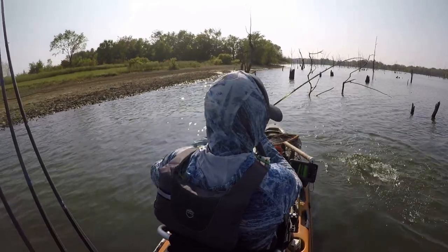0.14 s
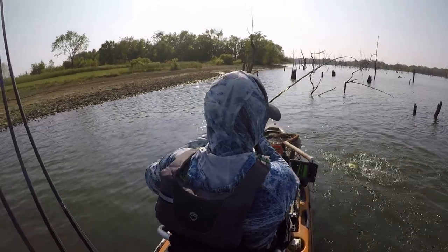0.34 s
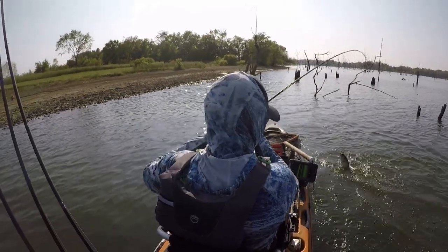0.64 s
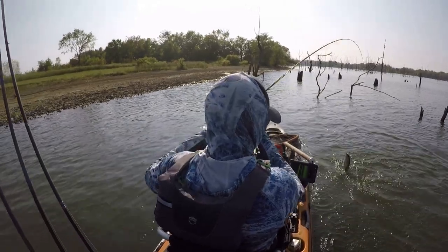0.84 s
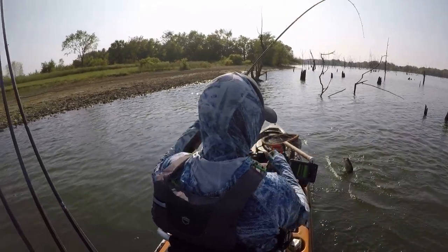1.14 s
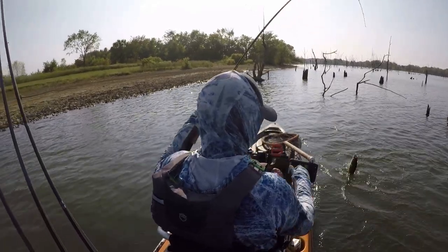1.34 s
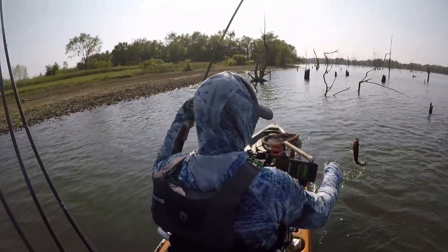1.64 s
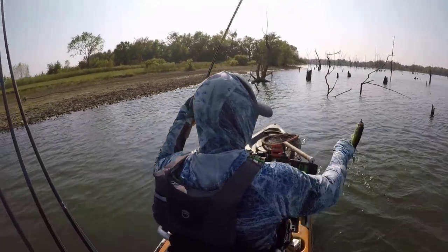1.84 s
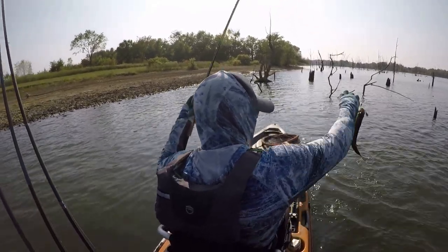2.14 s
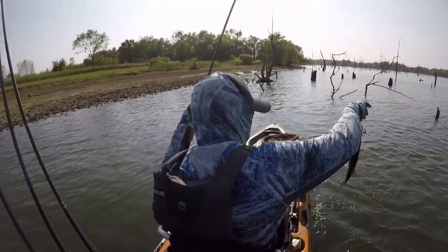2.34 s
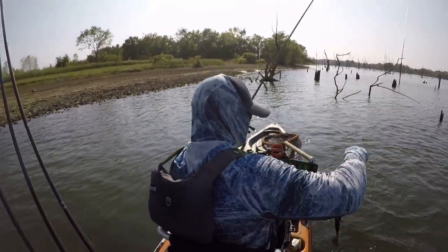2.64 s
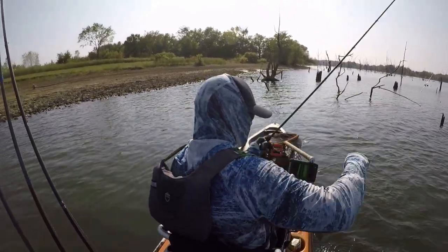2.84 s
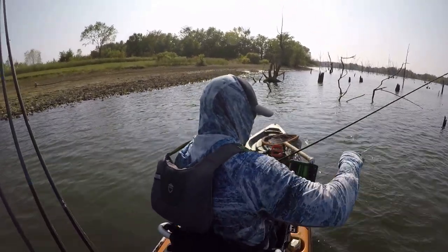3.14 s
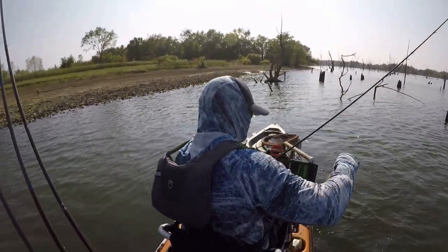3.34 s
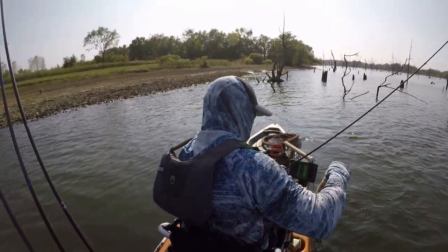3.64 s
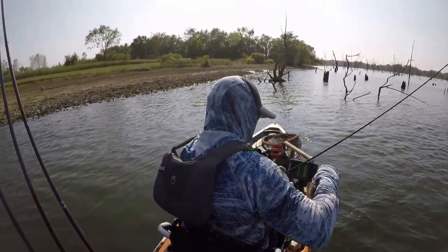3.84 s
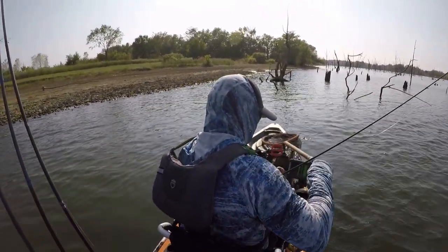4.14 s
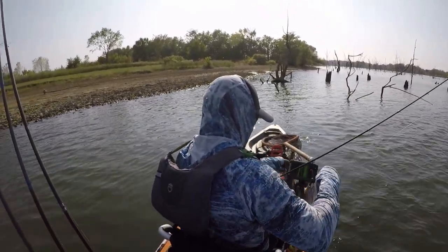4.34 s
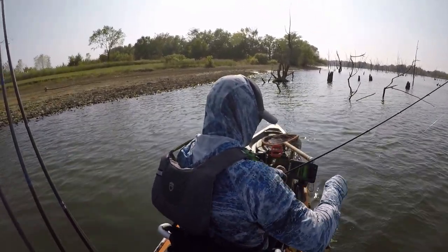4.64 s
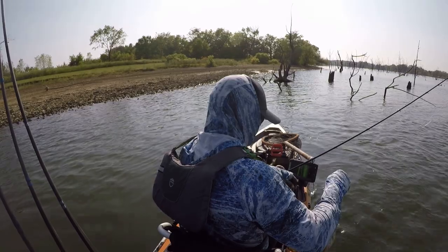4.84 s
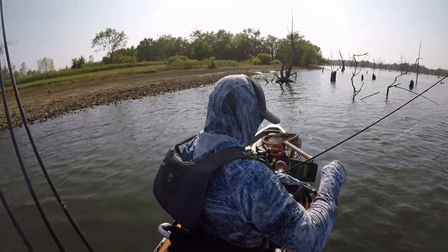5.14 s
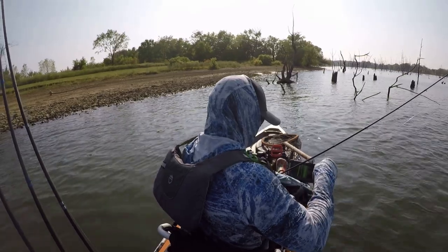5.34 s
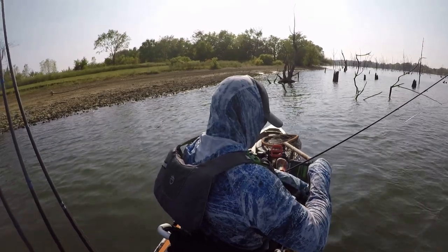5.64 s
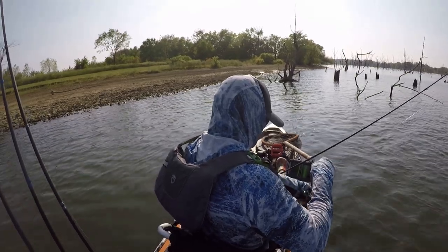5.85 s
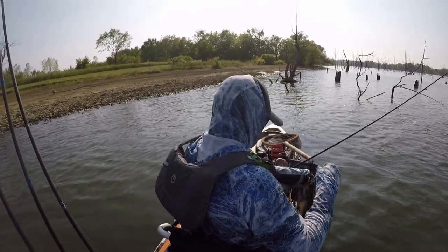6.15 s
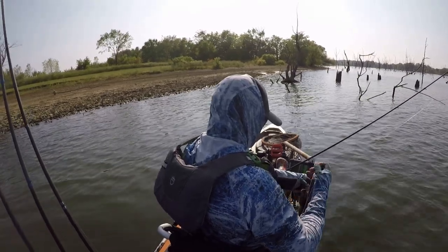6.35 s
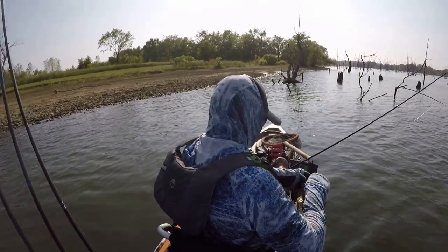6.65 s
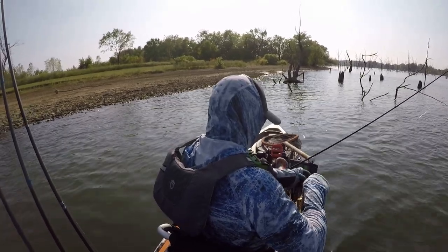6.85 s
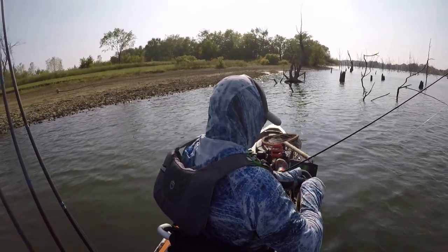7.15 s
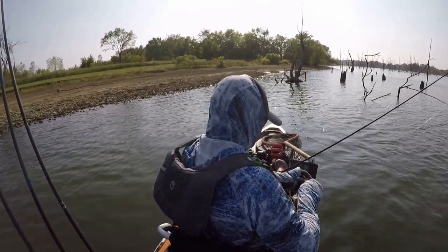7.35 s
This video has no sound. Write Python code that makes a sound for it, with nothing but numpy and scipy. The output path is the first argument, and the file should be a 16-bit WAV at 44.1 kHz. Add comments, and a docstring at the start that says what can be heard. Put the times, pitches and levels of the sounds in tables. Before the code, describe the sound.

A small fish splashes and bubbles beside a kayak, then gear clicks and hollow hull knocks follow over a low motor hum outdoors.

```python
"""From the start insects hiss along the shore, a motor hums and the camera, on a pole behind the angler, ticks.
A small fish thrashes beside the kayak: noise spray dies away over gliding bubble tones and faint ticks.
It is lifted in and unhooked amid gear clicks, swishing cloth, deck scrapes and knocks, crowded around 4 s.
Splash, gear and cloth come by air; knocks, hum and hull rumble come up the pole as decaying tones, steady
tones and filtered noise, and rock the two microphone ports against each other."""
import sys
import numpy as np
from scipy import signal
from scipy.fft import rfft, irfft
from scipy.io import wavfile
from scipy.ndimage import uniform_filter1d

SR = 44100
rng = np.random.default_rng(int(sys.argv[2]) if len(sys.argv) > 2 else 0)


def generate_wav(sig):
    """Save sig (samples, or channels by samples) to the path in sys.argv[1] as 16-bit PCM at SR."""
    pcm = np.round(np.clip(np.atleast_2d(sig).T, -1, 1) * 32767).astype(np.int16)
    wavfile.write(sys.argv[1], SR, pcm)


def volts_from_db(level):
    """Convert decibel levels to linear amplitude ratios."""
    exponent = np.asarray(level, float) / 20
    return 10 ** exponent


N = 330074
T = np.arange(N) / SR  # seconds
# how each hull part follows the load: (dB at a load of -35 dB, dB per dB of load)
SWAY, DEEP, HULL, LOW_TONE = (-43.5, 0.86), (-36, 1.17), (-37, 0.31), (-36.5, 1.19)


def noise():
    """White noise over the whole scene."""
    return rng.standard_normal(N)


def unit(x):
    """Scale to rms 1."""
    return x / np.sqrt(np.mean(x ** 2))


def band(x, lo_hz, hi_hz, order=2):
    """Band-pass, steeper with order."""
    return signal.sosfilt(signal.butter(order, [lo_hz, hi_hz], "band", fs=SR, output="sos"), x)


def ring(x, hz, width_hz):
    """One resonance, gain 1 at its centre."""
    return signal.lfilter(*signal.iirpeak(hz, hz / width_hz, SR), x)


def columns(table):
    """Curve columns sample by sample; the first column is time in seconds."""
    s, *cols = np.transpose(table)
    return [np.interp(T, s, c) for c in cols]


def spectrum_gain(points):
    """Gain at each FFT bin from (Hz, dB) points, drawn straight over log frequency."""
    hz, db = np.transpose(points)
    f = np.maximum(np.fft.rfftfreq(N, 1 / SR), 1)
    return volts_from_db(np.interp(np.log(f), np.log(hz), db))


def coloured(points):
    """Noise with a (Hz, dB) spectrum, rms 1."""
    return unit(irfft(rfft(noise()) * spectrum_gain(points), N))


def walk(rate):
    """Random levels held 1 / rate s and slewed twice; spread near 1."""
    k = int(SR / rate)
    held = np.repeat(rng.standard_normal(N // k + 1), k)
    return 1.396 * uniform_filter1d(uniform_filter1d(held, k), k)[:N]


def add(out, s, grain):
    """Mix a grain in at time s."""
    i = max(int(s * SR), 0)
    out[..., i:i + grain.shape[-1]] += grain[..., :N - i]


def stereo(mid, side):
    """Two ports from the part they hear alike and the part they hear opposed."""
    return np.array([mid + side, mid - side])


def span(t0, t1, fade):
    """1 between two times, with soft ends."""
    return np.clip(np.minimum(T - t0, t1 - T) / fade + .5, 0, 1)


def load(part):
    """Level in dB of a part of the hull as water and weight work it."""
    # Each row: time in seconds, load in dB.
    load_curve = [(0.0, -36.5), (1.65, -40.5), (2.29, -37), (2.58, -39), (2.85, -42), (3.12, -46),
                  (3.77, -38.5), (4.02, -27.5), (4.21, -31), (4.62, -33.5), (5.58, -27.5), (6.44, -31.5),
                  (6.67, -27), (7.48, -36.5)]
    return part[0] + part[1] * (columns(load_curve)[0] + 35)


def by_air(x):
    """The ports hear a sound out of step: part of the opposed sound is a quarter cycle off, flipped in the treble."""
    # How far apart the ports hear a sound. Each row: frequency in Hz, gain in dB of the opposed
    # part, ahead of the factors 0.46 and -0.3 below.
    port_gains = [(600, 7), (1200, 5.5), (2200, 1.5), (3000, -3.5), (4000, -3), (5000, -4), (6500, 8.5),
                  (10000, 0)]
    f = np.maximum(np.fft.rfftfreq(N, 1 / SR), 1)
    turn = 1j * np.tanh((4500 - f) / 300)
    side = irfft(rfft(x) * spectrum_gain(port_gains) * (0.46 * turn - .3), N)
    return stereo(x, side)


def shore():
    """Smooth far hiss of shaped noise; one insect, a narrow noise band, swells in and out above it."""
    # Hiss alike in both ports. Each row: frequency in Hz, relative spectrum level in dB.
    alike = [(180, 4), (300, -1), (663, -4), (2040, -12), (2980, -14.5), (3630, -8), (6050, -7.5),
             (8010, -16), (8700, -15.5), (12700, -26), (15500, -34)]
    # Hiss opposed in the ports. Each row: frequency in Hz, relative spectrum level in dB.
    opposed = [(180, -15), (300, 0), (366, -11.5), (877, -9.5), (3180, -32), (3690, -26.5), (5390, -21),
               (5950, -16.5), (6570, -22.5), (10400, -33), (12700, -41), (15500, -51)]
    mid_db, side_db = -50, -46
    mid = volts_from_db(mid_db + 0.11 * walk(2.65)) * coloured(alike)
    side = volts_from_db(side_db + 0.23 * walk(3.7)) * coloured(opposed)
    swell = np.sin(np.pi * (T - .09) / .43) ** 4  # one swell each 0.43 s
    insect = volts_from_db(-64) * swell * unit(ring(noise(), 7050., 350.))
    return stereo(mid - 0.16 * side, side + insect)


def hum():
    """Tones in the hull waver a little, nearly alike in both ports: the lowest swells with the load on the
    hull, the next is the motor's, and a higher one comes and goes."""
    # Level of the second tone. Each row: time in seconds, level in dB before the gain of each port.
    motor_level = [(0, -42.5), (2.4, -37.5), (3.4, -34), (3.9, -39), (4.3, -35), (4.5, -32.5), (5.8, -31),
                   (6.4, -27.5), (7.48, -31.5)]
    # The two lower tones, in Hz: a hull tone that follows the load, then the motor tone.
    tone_hz = [82.5, 189.9]
    overtone_db = -50 - 14 * (1 - span(0, 1.567, 0.079) - 1.03 * span(2.54, 2.91, 0.3))
    levels = [load(LOW_TONE)] + columns(motor_level) + [overtone_db]
    out = 0
    for hz, db in zip(tone_hz + [386.5], levels):
        phase = 2 * np.pi * np.cumsum(hz * (1 + 0.004266 * walk(4.6))) / SR
        ports = np.array([volts_from_db(-0.95) * np.sin(phase + 0.094), volts_from_db(1.36) * np.sin(phase)])
        out = out + np.sqrt(2) * volts_from_db(db + 1.45 * walk(16)) * ports
    return out


def rumble():
    """The pole sways one port far more than the other; three noise ranges of hull rumble rock near the pole's modes."""
    sway_db, deep_db, hull_db = load(SWAY), load(DEEP), load(HULL)
    # waves from the thrashing fish rock the pole at first
    wake_db, wake_db_per_s = -29, -14
    sway = (volts_from_db(sway_db) + volts_from_db(wake_db + wake_db_per_s * T)) * unit(ring(noise(), 34.46, 1.3))
    out = np.array([-.6 * sway, 2.5 * sway])
    # level dB, low Hz, high Hz, rocking mode Hz, rocking part dB
    ranges = ((deep_db, 42., 105., 60., -3),
              (hull_db, 95., 200., 135., -4),
              (.5 * hull_db - 29.5, 200., 420., 265., -2.5))
    for db, lo, hi, mode, side_db in ranges:
        mid, side = (band(noise() * volts_from_db(2.18 * walk(25)), lo, hi, order=3) for _ in range(2))
        rocking = volts_from_db(side_db) * unit(ring(side, mode, mode))
        out = out + volts_from_db(db) * stereo(unit(mid), rocking - 0.059 * unit(mid))
    return out


def camera():
    """A high tick once a frame and a thin whine of narrow noise from the electronics."""
    since = (T - .0150) % (1001 / 30000)  # seconds into the frame
    pulse = np.exp(-((since - .0025) / 0.0032) ** 2)
    tick = volts_from_db(-58.0) * pulse * np.sin(2 * np.pi * 8560 * since + 0.59 * walk(30))
    whine = volts_from_db(-63.5 - 0.31 * T + 0.71 * walk(1.27)) * unit(ring(noise(), 6148., 4.3))
    return np.array([tick + whine, tick + 0.48 * whine])


def scrape():
    """Water and gear rub along the deck: uneven friction noise rings resonances that fall away steeply."""
    # Rubs. Each row: start in seconds, end in seconds, level in dB, fade in seconds.
    rubs = [(0, 0.2, -50, 0.12), (0.447, 0.507, -62, .022), (4.083, 4.283, -53.5, .04),
            (4.42, 4.517, -54, .022), (5.278, 5.734, -49.5, 0.024), (5.676, 6.055, -56.5, 0.11),
            (6.636, 6.95, -52.5, 0.29)]
    # Deck resonances. Each row: centre in Hz, half the width of each ring pass in Hz, gain in dB.
    deck_modes = [(863, 145, 30.5), (1083, 52, 25), (1390, 110, 15)]
    grains = noise() * volts_from_db(0.4 * walk(90))
    deck = 0.085 * band(grains, 630.0, 1500.0, order=3)
    for hz, half_width, db in deck_modes:
        once = ring(grains, hz, 2.0 * half_width)
        deck = deck + volts_from_db(db) * ring(once, hz, 2.0 * half_width)
    level = sum(volts_from_db(db) * span(t0, t1, fade) for t0, t1, db, fade in rubs)
    return level * unit(deck)


def rustle():
    """Dense tiny noise grains: spray dying away after the thrashing, then short swishes of sleeve and line."""
    # Swishes. Each row: start in seconds, end in seconds, level in dB, colour in Hz.
    strokes = [(0.99, 1.066, -53, 2870), (1.444, 1.516, -45.5, 3430), (2.292, 2.328, -50.5, 4400),
               (2.48, 2.572, -51.5, 3900), (3.961, 4.04, -49, 3580), (4.057, 4.203, -47.5, 3800),
               (4.233, 4.313, -47.5, 3580)]
    drops = noise() * volts_from_db(3.3 * walk(300))
    # the heavy water falls back first, the fine mist hisses on
    heavy = volts_from_db(-41.5 - 36 * T) * unit(band(drops, 1400.0, 4200.0))
    mist = volts_from_db(-46.0 - 12.6 * T) * unit(band(drops, 3200.0, 7540.0))
    grains = noise() * volts_from_db(2.0 * walk(200))
    swishes = np.zeros(N)
    for t0, t1, db, hz in strokes:
        low = band(grains, 0.71 * hz, 1.17 * hz, order=3)
        high = band(grains, 1.5 * hz, 2.0 * hz)
        swishes += volts_from_db(db) * span(t0, t1, 0.017) * unit(low + 0.69 * high)
    return span(-1, 0.94, 0.24) * (heavy + mist) + swishes


def patter():
    """Faint random ticks of drops and rattling gear, each a few rough cycles at a pitch of its own."""
    # Stretches of ticks. Each row: start in seconds, end in seconds, nominal tick level in dB.
    stretches = [(0, 0.4, -48.5), (0.401, 0.852, -48.5), (4.096, 4.212, -45), (4.23, 4.52, -45)]
    out, t = np.zeros(N), T[:400]
    for t0, t1, db in stretches:
        for when, size, pitch in rng.random((160, 3)):
            hz = 1100 * 7.0 ** pitch
            life = t * hz / (2.2 + 3 * pitch)
            grain = life * np.exp(1 - life ** 2) * np.sin(2 * np.pi * hz * t)
            add(out, t0 + (t1 - t0) * when, volts_from_db(db - 2.3 * np.log(.015 + size)) * grain / 2)
    return out * volts_from_db(1.2 * walk(2500))


def bubbles():
    """Short tones glide up as the cavity closes: the clear ones, and a crowd of faint ones under the spray."""
    # Clear bubbles. Each row: start in seconds, nominal peak in dB, start pitch in Hz, glide in octaves.
    cavities = [(0.017, -31, 2100, 0.45), (.031, -30, 1510, 0.091), (.078, -31, 767, .1),
                (.164, -34, 2210, 1.8), (0.187, -29, 1200, 0.69), (.19, -32, 590, 0.083),
                (0.255, -36, 1800, 1.3), (.276, -34.5, 670, 0.29), (0.312, -32, 2800, 0.79),
                (0.397, -33, 1880, 2.4), (.475, -37.5, 990, .05), (.558, -36, 693, 0.22),
                (0.562, -23.5, 369, 0.24), (0.621, -38, 470, .2), (0.618, -37, 1320, 0.5),
                (0.681, -40, 1390, 1.2), (0.745, -29.5, 5600, 0.16), (0.845, -35, 2710, .15),
                (0.928, -38, 2880, 0.19), (1.26, -38, 900, 0.36), (1.39, -39, 880, 0.079),
                (1.587, -41.5, 1610, .14), (3.817, -26, 475, 0.073), (4.341, -19.5, 581, 0.044),
                (4.585, -31.5, 823, 0.074)]
    life_cycles, cycles_per_octave = 10.2, 7.4  # at the start pitch; a wide glide lasts longer
    clear = [(*row, life_cycles + cycles_per_octave * row[3]) for row in cavities]
    when, size, pitch, glide = rng.random((500, 4)).T
    hz = 600 * 10.5 ** pitch
    faint_db = -45 - 10 * when - 3.5 * np.log(.02 + size)
    faint = np.c_[.85 * when ** 2.2, faint_db, hz, .6 * glide, 5 + .0012 * hz]
    out = np.zeros(N)
    wobble = .03 * walk(200)  # octaves; the cavity is tossed about
    for s, db, hz, octaves, cycles in np.r_[clear, faint]:
        life = T[:2000] * hz / cycles
        bend = octaves * np.minimum(life, 1) + wobble[int(s * SR):][:len(life)]
        phase = 2 * np.pi * np.cumsum(hz * 2 ** bend) / SR
        shape = 0.88 * np.tanh(life / 0.24) * np.exp(-.9 * life) * np.exp(-life ** 4)
        add(out, s, volts_from_db(db) * shape * np.sin(phase))
    # broken water makes each tone flutter
    return out * volts_from_db(2.5 * walk(1300))


def clicks():
    """Gear, hook and slaps: hard contact noise around the object's colour, over the lower knock of its body."""
    # Contacts. Each row: start in seconds, contact level in dB (its peak is 2.5 dB higher),
    # colour in Hz, body peak in dB.
    contacts = [(0.232, -44, 1100, -35.5), (0.285, -35, 7000, -55), (0.352, -11, 4360, -24.5),
                (0.364, -33, 2600, -50), (0.412, -22, 4500, -35.5), (0.4547, -29, 6340, -55),
                (0.4753, -31.5, 4840, -49), (0.564, -33, 4470, -46), (0.695, -33.5, 5340, -41),
                (0.784, -32, 5800, -44), (2.307, -34, 5600, -50), (2.46, -38, 6000, -54),
                (3.0503, -38, 2200, -27), (3.063, -16.5, 5270, -41), (3.0665, -16.5, 6600, -47),
                (3.301, -37, 5000, -58), (3.4693, -34.5, 5180, -45), (3.8284, -32.5, 3620, -39),
                (3.9973, -14.5, 2700, -25.5), (4.042, -27, 5900, -39), (4.057, -32, 3100, -48),
                (4.102, -33.5, 4950, -35), (4.122, -31, 3380, -43), (4.14, -31.5, 3600, -52),
                (4.162, -41, 3400, -48), (4.176, -30, 3360, -60), (4.1872, -26.5, 4860, -35.5),
                (4.198, -28, 3000, -53), (4.236, -25, 3180, -30), (4.24, -24.5, 4440, -38),
                (4.256, -37, 2300, -49), (4.2769, -25.5, 5900, -35.5), (4.293, -30, 3430, -33),
                (4.33, -31.5, 3480, -53), (4.4082, -29, 3300, -29.5), (4.43, -40, 1500, -29),
                (4.4558, -32.5, 3900, -33), (5.293, -36, 2660, -29), (5.6409, -40, 2760, -28),
                (5.671, -29.5, 2300, -15.5), (5.681, -33, 2140, -23.5), (5.8596, -32.5, 3870, -43),
                (5.975, -40, 4000, -42), (6.025, -42, 2500, -38), (6.041, -35, 4360, -42),
                (6.102, -47, 1500, -39.5), (7.015, -39, 3000, -51), (7.317, -32.5, 6200, -44)]
    # burst length in seconds at 4 kHz and -24 dB; duller and louder ones last longer
    burst_s, colour_power, growth_per_db = 0.0031, 0.15, 0.03
    out, t = np.zeros(N), T[:3000]
    for s, db, hz, body_db in contacts:
        hiss = rng.standard_normal(len(t))
        life = t / (burst_s * (4000 / hz) ** colour_power * np.exp(growth_per_db * (db + 24)))
        attack = 1 - np.exp(-(life / 0.3) ** 2.5)
        decay = np.exp(-1.3 * life ** 1.5) + 0.1 * np.exp(-t / 0.005)
        burst = hiss * attack * decay
        bright = band(burst, 6300., 7900.)
        air = min(hz / 4200, 1) ** 3 * band(burst, 8500., 14000.)
        # brighter and louder contacts carry more treble
        treble_gain = (hz / 5000) ** 0.43 * volts_from_db(0.086 * (db + 27))
        top = band(burst, 0.54 * hz, min(1.345 * hz, 11000.)) + (0.56 * bright + 0.05 * air) * treble_gain
        # the top of the body dies first
        body = band(hiss * np.exp(-t / 0.011), 506.0, 1530.0)
        body = body + 0.83 * band(hiss * np.exp(-t / 0.0045), 1390.0, 1615.0)
        add(out, s, volts_from_db(db + 2.5) * top / np.abs(top).max() + volts_from_db(body_db) * body / np.abs(body).max())
    return out


def knocks():
    """Each blow on the hull is a thud of a few cycles with a hard edge; its rocking part sets the pole ringing."""
    # Blows. Each row: time in seconds, rocking thud level in dB, in-phase thud level in dB,
    # pitch at the peak in Hz, hard edge strength in dB.
    hull_blows = [(0.234, -39, -19, 317, -21.5), (0.248, -30, -19, 308, -23), (0.493, -35, -20.5, 193, -40),
                  (0.699, -13, -25, 165, -21), (1.104, -13.5, -27.5, 143, -34),
                  (1.262, -11, -38, 278, -17.5), (1.299, -17, -21, 200, -38), (1.893, -13, -21.5, 212, -25),
                  (2.054, -9.5, -17, 173, -25), (3.055, -14.5, -18, 295, -15),
                  (3.305, -15, -16.5, 200, -26), (3.386, -20, -17.5, 195, -22.5),
                  (3.504, -6.5, -9, 193, -14.5), (3.823, -28, -10.5, 265, -23),
                  (3.854, -10.5, -18, 253, -64), (4.021, -3.5, -11, 119, -19),
                  (4.057, -12, -11.5, 132, -28), (4.22, -21, -20.5, 252, -51), (4.321, -9.5, -23, 233, -30),
                  (4.348, -3, -14, 200, -18), (4.418, -11.5, -17, 126, -36), (5.072, -11.5, -22, 163, -39),
                  (5.416, -9.5, -44, 247, -22), (5.645, -4.5, -27, 226, -16), (5.708, -10, -20.5, 255, -19),
                  (5.729, -15, -14.5, 102, -57), (5.895, -19, -17, 159, -41),
                  (6.197, -6.5, -16.5, 157, -22), (6.38, -2.5, -10.5, 186, -8.5),
                  (6.525, -11, -16, 139, -29), (6.71, -15, -27, 142, -24)]
    # Pole modes. Each row: frequency in Hz, relative level in dB, time to fall 60 dB in seconds.
    pole_modes = [(28.4, -5.5, 0.38), (58, -12.5, 0.28), (135, -2, 0.11), (262.4, -8.5, 0.18)]
    # Hull shell modes, rung by a hard edge. Each row: frequency in Hz, relative level in dB,
    # time to fall 60 dB in seconds.
    shell_modes = [(517, -32, 0.021), (613, -8.5, 0.089), (900, -2, 0.023), (1200, -1, 0.021)]
    hard_cycles, soft_cycles_per_db = 1.22, 0.11
    mid, side, blows, edges = np.zeros((4, N))
    t = np.arange(-1300, 4000) / SR
    turns = rng.uniform(0, 2 * np.pi, len(hull_blows))
    for (s, side_db, mid_db, hz, edge_db), turn in zip(hull_blows, turns):
        # a blow lasts longer the further its edge lies under its thud
        softness_db = max(max(side_db, mid_db) - edge_db, 0)
        half = (hard_cycles + soft_cycles_per_db * softness_db) / (2 * hz)  # seconds to halve
        shape = np.where(t < 0, .5 ** ((t / (0.56 * half)) ** 2), .5 ** (t / half))
        # the pitch sags away from the peak
        phase = 2 * np.pi * hz * (t - 9.3 * t * np.abs(t)) + turn
        add(side, s + t[0], volts_from_db(side_db) * shape * np.cos(phase))
        add(mid, s + t[0], -volts_from_db(mid_db) * shape * np.cos(phase - .8))
        add(blows, s - .004, volts_from_db(side_db) * np.hanning(90) / 45)
        add(edges, s - min(half, .004), volts_from_db(edge_db) * np.hanning(40) / 20)
    t = T[:SR // 2]
    pole, shell = (sum(volts_from_db(db) * np.sin(2 * np.pi * hz * t) * 1000. ** (-t / t60) for hz, db, t60 in modes)
                   for modes in (pole_modes, shell_modes))
    rings = signal.fftconvolve(blows, pole)[:N]
    edge = signal.fftconvolve(edges, shell)[:N]
    return stereo(mid - 0.39 * rings - 0.16 * edge, side + rings + 0.65 * edge)


def scene():
    """Steady background, sounds that come by air, and knocks up the pole."""
    background = shore() + hum() + rumble() + camera()
    airborne = scrape() + rustle() + patter() + bubbles() + clicks()
    return background + by_air(airborne) + knocks()


def low_pass(x):
    """Removes everything above the highest recorded frequency."""
    return signal.sosfilt(signal.butter(12, 16000, fs=SR, output="sos"), x)


def record(dry):
    """The loudest knocks are rounded a little and both ends of the frequency range are cut."""
    rounded = np.tanh(dry)
    cut = signal.sosfilt(signal.butter(8, 14300., fs=SR, output="sos"), rounded)
    cut = signal.sosfilt(signal.butter(2, 18, "high", fs=SR, output="sos"), cut)
    return low_pass(cut)


dry = scene()
out = record(dry)
generate_wav(out)
```